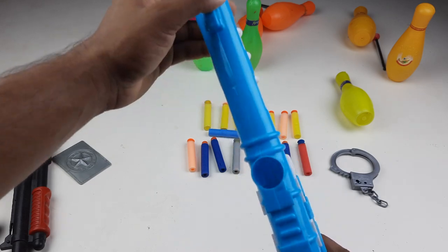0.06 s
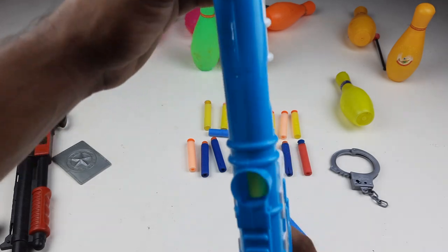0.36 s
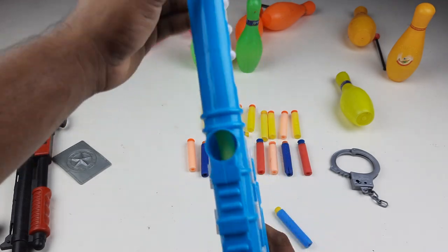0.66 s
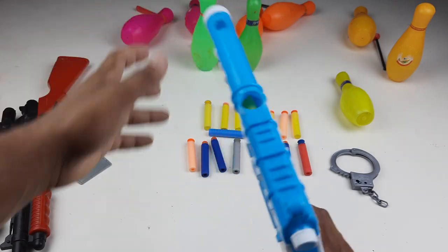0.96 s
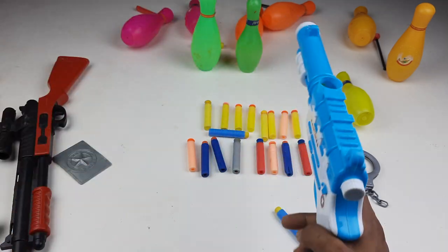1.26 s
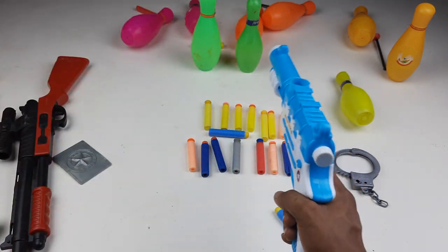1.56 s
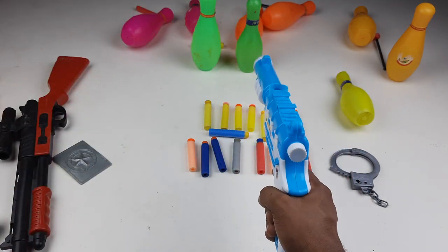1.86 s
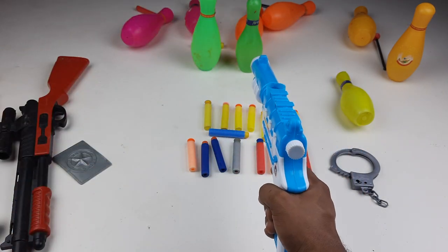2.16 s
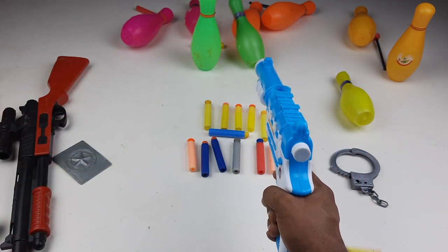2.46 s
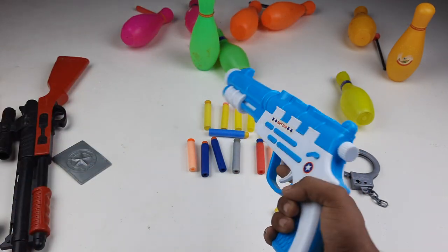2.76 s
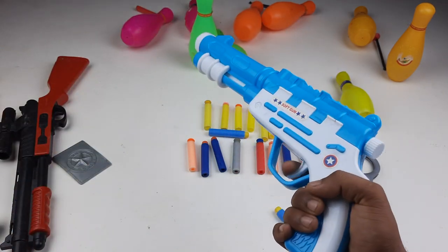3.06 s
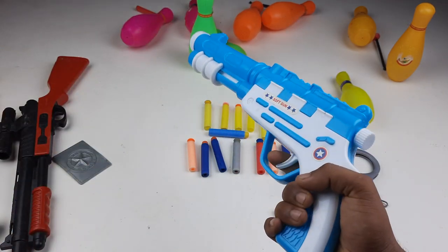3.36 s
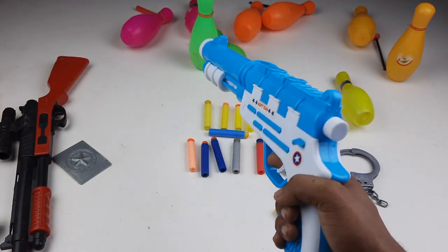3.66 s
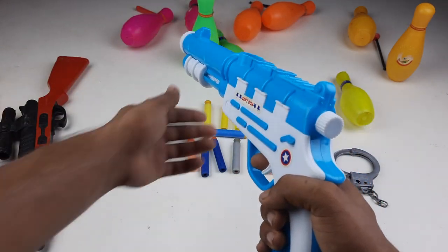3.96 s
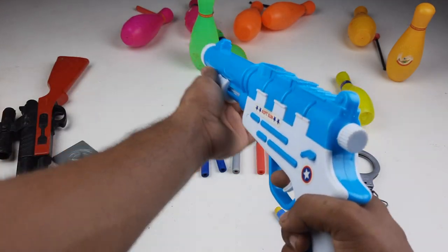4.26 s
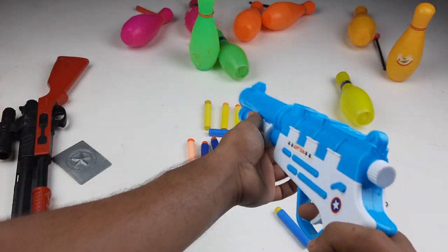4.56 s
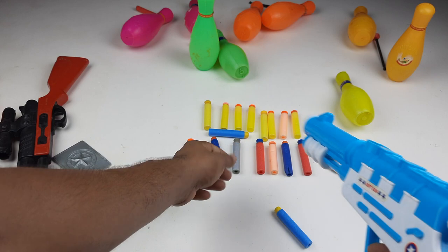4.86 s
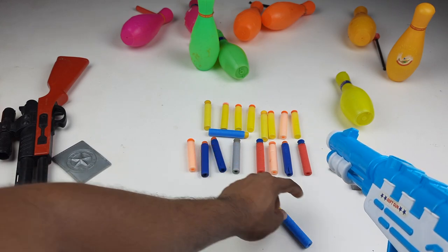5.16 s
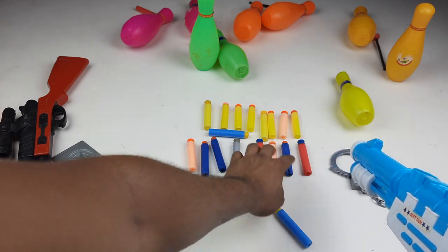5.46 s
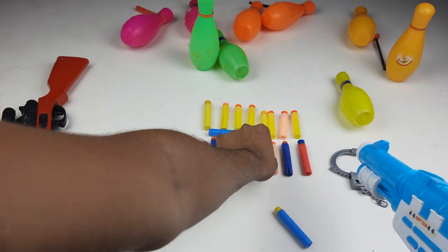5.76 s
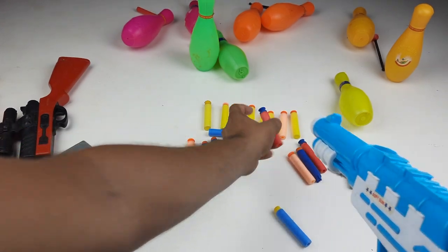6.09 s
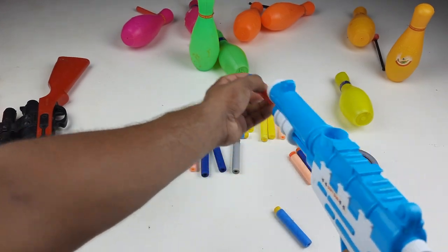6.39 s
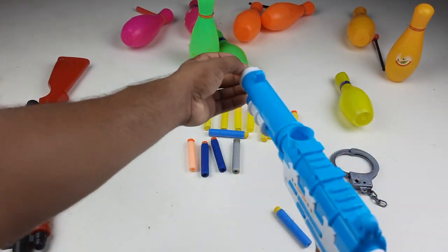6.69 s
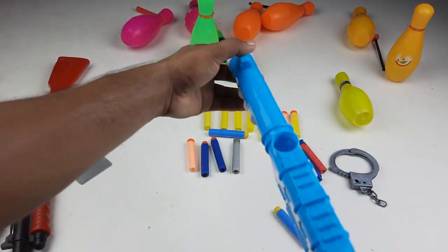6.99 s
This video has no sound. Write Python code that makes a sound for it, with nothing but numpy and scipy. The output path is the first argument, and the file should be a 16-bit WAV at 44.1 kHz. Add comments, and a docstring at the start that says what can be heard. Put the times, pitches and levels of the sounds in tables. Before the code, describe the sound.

A plastic toy pistol is handled close to the microphone in a small room. From about 0.3 to 0.9 seconds, a foam dart goes in with a few hollow clacks and light ticks. At 2.3 seconds the pistol fires with a sharp, springy snap, the loudest sound. Hollow toy bowling pins knock together and thud on the table until about 2.9 seconds. From 3 to 3.7 seconds come soft trigger clicks, grip creaks and low handling bumps on the left. Around 4.3 seconds the slide rasps back and latches loudly, returning at 4.7 with a short, high squeak and a clack. A soft thud and faint finger rustles follow, then reloading clicks near 6.9 seconds. A faint low room drone continues throughout, with very faint, distant birdlike whistles during the first two seconds and again from about 5 seconds.

```python
"""A small room, at a table: a plastic toy pistol is handled close to a phone's two microphones.
Fingers push a foam dart in, the spring plunger fires it into hollow toy bowling pins, and the slack
trigger clicks. The slide is pulled back, latches and returns with a stick-slip squeak; another dart is
picked up and loaded. Each blow rings a hollow plastic body. Behind it all the room drones low, and
far away a thin whistled phrase, probably a bird, comes twice."""
import sys
import numpy as np
from scipy import signal
from scipy.fft import rfft, irfft, next_fast_len
from scipy.io import wavfile
from scipy.ndimage import uniform_filter1d

SR = 44100
rng = np.random.default_rng(int(sys.argv[2]) if len(sys.argv) > 2 else 0)


def master(y):
    """Save y as 16-bit WAV."""
    cut = np.clip(np.atleast_2d(y).T, -1, 1)
    pcm = np.round(cut * 32767)  # scale
    wavfile.write(sys.argv[1], SR, pcm.astype(np.int16))


N = 314433
TIME = np.arange(N) / SR
HIT = 2 * SR // 5  # samples in one blow


def undb(db):
    """Decibels to gain."""
    return 10 ** (np.asarray(db) / 20)


def curve(rows):
    """The columns of a table, joined by straight lines in time."""
    s, *columns = np.transpose(rows)
    return [np.interp(TIME, s, c) for c in columns]


def along(points, hz):
    """Read (f/Hz, value) points on a log-frequency axis."""
    f, value = np.transpose(points)
    return np.interp(np.log(hz + 1), np.log(f), value)


def unit(x):
    """Scale to rms 1."""
    return x / np.sqrt(np.mean(x ** 2))


def unit_peak(x):
    """Scale each channel so that its loudest 3 ms have rms 1."""
    return x / np.sqrt(uniform_filter1d(x ** 2, 132).max(axis=1, keepdims=True))


def wander(size, smooth):
    """Random drift of rms 1: noise averaged over `smooth` samples."""
    return unit(uniform_filter1d(rng.standard_normal(size), smooth))


def pan(db):
    """Gains that put the left microphone db above the right."""
    return undb(np.array([[db], [-db]]) / 2)


def add(track, s, x):
    """Mix a sound in at s seconds."""
    i = int(s * SR)
    track[:, i:i + x.shape[1]] += x[:, :N - i]


def mic_noise(alike_hz, size):
    """Noise at the two microphones: long waves reach both alike, short ones differ."""
    padded = next_fast_len(size)
    noise = rfft(rng.standard_normal((3, padded)))
    shared = 1 / (1 + np.arange(padded // 2 + 1) * SR / padded / alike_hz)
    return irfft(np.sqrt(shared) * noise[0] + np.sqrt(1 - shared) * noise[1:], padded)[:, :size]


def colour(x, points, tilt_db=0, size=1024):
    """Causal filter with the given spectrum, tilted by tilt_db per octave in the treble."""
    hz = np.arange(size // 2 + 1) * SR / size
    db = along(points, hz) + tilt_db * np.log2(np.maximum(hz / 3500, 1))
    cepstrum = irfft(db * np.log(10) / 20)
    cepstrum[1:size // 2] *= 2  # fold to minimum phase
    cepstrum[size // 2 + 1:] = 0
    response = irfft(np.exp(rfft(cepstrum)))
    return signal.fftconvolve(x, response[None], axes=1)[:, :x.shape[1]]


def resonate(x, modes, damping=1, stretch=1):
    """A body's resonances side by side; damping shortens their ring and stretch detunes them."""
    return sum(undb(db) * signal.lfilter(*signal.iirpeak(hz * stretch, hz / (width * damping), SR), x)
               for hz, width, db in modes)


def contact(t60, alike_hz, rise_s=0.0009):
    """The push of a blow: a quick start that dies away in tiny rebounds."""
    t = TIME[:HIT]
    return mic_noise(alike_hz, HIT) * (1 - np.exp(-t / rise_s)) * undb(-60 * t / t60)


def slips(per_s, scatter_db, slip_s):
    """Friction: dense little slips of uneven size."""
    starts = rng.random(N) < per_s / SR
    sizes = undb(scatter_db * np.clip(rng.standard_normal(N), -2, 2))
    envelope = signal.lfilter([1], [1, -np.exp(-1 / (slip_s * SR))], starts * sizes)
    return envelope * mic_noise(1600, N)


def swell(x, strokes, attack_share, release_s, db_per_s=0):
    """Shape a sound in strokes: each fades in over a share of its length, holds or grows, then dies."""
    envelope = 0
    for s, length, db in strokes:
        past_end = TIME - s - length
        attack = np.clip((TIME - s) / (attack_share * length), 0, 1)
        shape_db = db_per_s * np.clip(past_end, -length, 0) - 60 * np.maximum(past_end, 0) / release_s
        envelope = envelope + attack * undb(db + shape_db)
    return unit(x) * envelope


# Room tone, all around. Spectrum: f/Hz, relative level/dB
DRONE_SPECTRUM = [(20, -30), (45, -14), (65, -6), (95, -11.5), (133, 2), (180, -15.5), (270, -13),
                  (400, -22), (650, -34), (1000, -37), (2000, -49), (8000, -70)]
# Its rise and fall: t/s, level/dB
DRONE_LEVEL = [(0, -55.5), (.9, -59), (1.4, -63), (1.9, -63), (3.1, -64), (5.2, -61.5), (7.13, -67.5)]
# Self-noise of the microphones: f/Hz, relative level/dB
HISS_SPECTRUM = [(100, 6), (1500, 7), (4000, 4.5), (6000, 1), (8000, 2.5), (10000, 0), (16000, 0)]


def room_tone(hiss_db=-84.3):
    """A low drone in the room, under the faint hiss of the microphones."""
    drone = unit(colour(mic_noise(720, N), DRONE_SPECTRUM, size=8192))
    hiss = unit(colour(rng.standard_normal((2, N)), HISS_SPECTRUM))
    return drone * undb(curve(DRONE_LEVEL)[0]) * pan(1) + undb(hiss_db) * hiss


# Whistled phrase, far off, slightly left: t/s into it, length/s, first f/Hz, last f/Hz, relative level/dB
BIRD_NOTES = [(0, .68, 5020, 3920, 1), (.95, .42, 3800, 4327, -2), (1.123, .17, 3380, 3620, -2.5),
              (1.182, 0.29, 2960, 2830, -11), (1.88, .39, 3780, 4198, -3.5), (1.99, .17, 3340, 3525, -4.5)]
# Each time it is sung: t/s, level/dB
BIRD_SONGS = [(-.07, -73.5), (4.88, -74.5)]


def bird(fade_s=0.02, waver_hz=55, flutter_db=2.5, echo_t60=.5):
    """Thin, unsteady whistles glide from pitch to pitch, smeared by echoes on their long way."""
    song = np.zeros((1, N))
    for start, song_db in BIRD_SONGS:
        for s, length, first_hz, last_hz, db in BIRD_NOTES:
            t = TIME - start - s
            t = t[(t > 0) & (t < length)]
            waver, flutter = wander(SR, 150)[:len(t)], wander(SR, 1200)[:len(t)]
            hz = first_hz + (last_hz - first_hz) * t / length + waver_hz * waver
            fade = np.minimum(np.minimum(t, length - t) / fade_s, 1)
            level = fade * undb(song_db + db + flutter_db * flutter)
            add(song, max(start + s, 0), level * np.sin(2 * np.pi * np.cumsum(hz) / SR)[None])
    echoes = unit(mic_noise(2500, HIT) * undb(-60 * TIME[:HIT] / echo_t60)) / np.sqrt(HIT)
    return song * pan(2) + signal.fftconvolve(song, echoes, axes=1)[:, :N]


# Fingers and darts, close up: t/s, length/s, level/dB
FINGER_STROKES = [(0, .08, -77.5), (0.785, 0.046, -76), (0.94, 0.029, -78), (4.097, 0.2, -80.5),
                  (5.762, 0.087, -81.5), (5.837, 0.17, -67), (6.244, .025, -74.5), (6.319, 0.15, -74.5),
                  (6.593, 0.086, -69.5), (6.864, 0.0055, -49.5), (6.912, 0.0027, -65)]
# Rubbed foam: f/Hz, relative level/dB
FOAM_SPECTRUM = [(300, -10), (1500, -9), (3000, -13), (5500, -7), (7000, 1), (8400, 0), (9500, -12),
                 (12000, -8), (16000, -9)]


def fingers():
    """Fingers and foam darts scrape softly over the barrel and the table."""
    friction = colour(slips(1485, scatter_db=2.5, slip_s=0.0036), FOAM_SPECTRUM)
    return swell(friction, FINGER_STROKES, attack_share=0.163, release_s=0.31)


def thuds(rows, modes, push_s, gap_s, loss_db):
    """Soft, long pushes wake only low resonances; each rocks back twice, ever weaker."""
    out = np.zeros((2, N))
    soft = signal.butter(3, [.7 * modes[0][0], modes[-1][0]], "bandpass", fs=SR, output="sos")
    for s, db in rows:
        for k in range(3):
            push = signal.sosfilt(soft, contact(push_s, alike_hz=3020))
            late = k * gap_s * (1 + rng.uniform(-.17, .17))
            add(out, s + late, undb(db - k * loss_db) * unit_peak(resonate(push, modes)))
    return out


# Handling noise, on the left microphone: t/s, level/dB
HANDLING_BUMPS = [(0.03, -49.5), (3.39, -40.5), (3.452, -43.5), (3.53, -45), (3.63, -49), (3.685, -58.5)]
# Resonances of the microphone mount: f/Hz, width/Hz, relative level/dB
MOUNT_MODES = [(60, 16, 0), (112, 22, -3), (150, 30, -15)]


def handling():
    """Bumps reach the microphone as a low boom through its mount."""
    return thuds(HANDLING_BUMPS, MOUNT_MODES, push_s=0.032, gap_s=0.025, loss_db=5) * pan(21.5)


def clacks(rows, modes, knock_db, crack_db, loose_s, pan_db, knock_room_db, crack_room_db):
    """Plastic on plastic rings a hollow body and cracks in the treble. Returns direct sound, room feed."""
    direct, feed = np.zeros((2, 2, N))
    radiation = signal.butter(2, [modes[0][0], modes[-1][0]], "bandpass", fs=SR, output="sos")
    snap = undb(5.5) * signal.unit_impulse(HIT)
    for s, body_db, edge_db, chatter_s in rows:
        push = contact(chatter_s, alike_hz=700)
        damping = np.clip(loose_s / chatter_s, 1, 3)  # a firm grip stops both chatter and ring
        body = resonate(push + snap, modes, damping, stretch=1 + rng.uniform(-.025, .025))
        knock = undb(body_db + knock_db) * unit_peak(signal.sosfilt(radiation, body))
        edge = undb(crack_db) * crack(push, edge_db)
        add(direct, s, (knock + edge) * pan(pan_db))
        add(feed, s, knock * undb(knock_room_db) + edge * undb(crack_room_db))
    return direct, feed


# Hard plastic edges meeting, before the tilt: f/Hz, relative level/dB
CRACK_SPECTRUM = [(300, -29.5), (1200, -21), (2000, -8), (2500, -0.5), (3000, 0.5), (4500, 1), (6000, -1),
                  (8000, 0.5), (9600, -16.5), (11700, -6), (13600, -12), (16000, -13)]


def crack(push, db):
    """The treble of a blow: the harder it lands, the brighter it is."""
    return undb(db) * unit_peak(colour(push, CRACK_SPECTRUM, tilt_db=8 + 0.44 * db))


# Pistol, close, centre: loading, firing (2.26 s), slack trigger (3.1 s), cocking (4.3 s), reloading (6.9 s).
# t/s, relative knock level/dB, relative crack level/dB, chatter/s
PISTOL_BLOWS = [(0.264, -46.5, -61.5, .008), (0.2714, -34, -47.5, 0.011), (0.3186, -26, -39.5, 0.013),
                (0.3315, -32, -48.5, 0.015), (0.409, -31, -48, 0.0078), (0.4493, -52, -58, 0.0072),
                (0.533, -51, -62, 0.022), (0.692, -55.5, -72, 0.054), (0.813, -58, -67.5, 0.087),
                (2.2585, -27.5, -31.5, .039), (2.2643, -12.5, -14, 0.03), (2.277, -30.5, -47, 0.071),
                (2.292, -29, -17, 0.042), (3.112, -49, -47.5, 0.018), (3.163, -49, -58, 0.011),
                (3.375, -64, -45.5, 0.013), (3.499, -49.5, -55, 0.0071), (3.6285, -45, -40, 0.021),
                (3.672, -43, -39, 0.017), (4.346, -37, -47.5, .012), (4.358, -33.5, -50.5, 0.052),
                (4.37, -26.5, -35, .035), (4.3893, -18.5, -21, 0.02), (4.5405, -32, -41, 0.057),
                (4.7075, -23.5, -28.5, 0.0097), (6.8887, -48.5, -46.5, 0.021),
                (6.9216, -35.5, -44.5, 0.025), (6.987, -44, -53.5, 0.0053)]
# Its hollow shell: f/Hz, width/Hz, relative level/dB
SHELL_MODES = [(570, 150, -4.5), (785, 320, -13.5), (1150, 110, -11.5), (1240, 110, -7), (1287, 77, 0.5),
               (1406, 150, 1.5), (1600, 120, -1.5), (1830, 100, -4.5), (2150, 230, -11)]


def pistol():
    """The mechanism and the dart knock inside the shell. Returns direct sound, room feed."""
    return clacks(PISTOL_BLOWS + dart_rattle(), SHELL_MODES, knock_db=1.5, crack_db=3, loose_s=0.02,
                  pan_db=0.5, knock_room_db=-6, crack_room_db=-3.5)


# Dart worked along the barrel, close: t/s, length/s, relative level/dB
RATTLE_SPANS = [(0.293, 0.081, -59), (0.439, 0.17, -59.5), (.69, 0.21, -62.5), (6.871, 0.12, -57)]


def dart_rattle(count=4, scatter_db=3, crack_below_db=13, chatter_s=0.012):
    """The dart ticks against the barrel at chance moments. Returns rows of blows."""
    ticks = []
    for s, length, db in RATTLE_SPANS:
        for when, size in rng.random((count, 2)):
            knock_db = db + scatter_db * (2 * size - 1)
            ticks.append((s + length * when, knock_db, knock_db - crack_below_db, chatter_s))
    return ticks


# Plunger spring, close: f/Hz, relative level/dB, t60/s
SPRING_MODES = [(1384, -5, .24), (2260, -8, .3), (3191, -7, .3), (3565, -3, .2), (3984, -3, .2),
                (4440, -5, .2), (5190, -6, .2), (5785, -5, .18), (6185, -4, .2), (6634, -5, .22),
                (7220, 0, .18), (7465, -2, .2), (7921, -4, .16), (8041, -1, .14), (11330, -15, .17),
                (15384, -8, .13)]


def shot(s=2.2643, ring_db=-26, puff_db=-18, puff_hz=72, puff_t60=0.053):
    """The released spring rings on; the air behind the dart leaves as a low puff. Returns ring, puff."""
    ring, puff = np.zeros((2, 2, N))
    t = TIME[:HIT]
    coils = sum(undb(db - 60 * t / t60) * np.sin(2 * np.pi * (hz * t + rng.random((2, 1))))
                for hz, db, t60 in SPRING_MODES)
    add(ring, s, undb(ring_db) * unit_peak(coils))
    add(puff, s, undb(puff_db - 60 * t / puff_t60) * np.sin(2 * np.pi * puff_hz * t) * pan(7))
    return ring, puff


# Thuds on the table, slightly left: t/s, level/dB
TABLE_THUDS = [(2.272, -31), (2.298, -30.5), (2.335, -40.5), (2.424, -45), (2.473, -44), (2.495, -30.5),
               (2.572, -32.5), (2.635, -38), (2.757, -45.5), (2.85, -55), (5.19, -52.5), (5.84, -60)]
# The table top: f/Hz, width/Hz, relative level/dB
TABLE_MODES = [(136, 22, 0), (195, 30, -10), (264, 30, -2), (345, 50, -3), (455, 60, -5)]


def table():
    """The table top thuds, mostly under the toppling pin."""
    return thuds(TABLE_THUDS, TABLE_MODES, push_s=0.081, gap_s=0.026, loss_db=7) * pan(2.5)


# Pins, slightly left, with more room on them than the pistol.
# t/s, relative knock level/dB, relative crack level/dB, chatter/s
PIN_BLOWS = [(2.4915, -35, -38, 0.014), (2.515, -43.5, -35.5, .02), (2.572, -52.5, -39, 0.017),
             (2.6135, -40, -32.5, 0.0086), (2.624, -62, -44, 0.011), (2.7738, -54, -43, 0.01),
             (2.865, -63, -54.5, 0.009)]
# A pin's hollow wall: f/Hz, width/Hz, relative level/dB
PIN_MODES = [(730, 290, -1), (1115, 140, 11), (1355, 53, 9), (1550, 250, 4.5), (1830, 250, -4)]


def pins():
    """Hollow pins are struck and knock together. Returns direct sound, room feed."""
    return clacks(PIN_BLOWS, PIN_MODES, knock_db=-3.5, crack_db=-8.85, loose_s=0.018,
                  pan_db=2.5, knock_room_db=6.5, crack_room_db=5)


# Grip and trigger under the hand, close: t/s, length/s, level/dB
GRIP_CREAKS = [(2.965, 0.06, -56), (3.211, 0.039, -47.5), (3.359, 0.023, -41.5), (3.46, 0.023, -42),
               (3.603, 0.029, -42.5), (3.661, 0.004, -48)]
# The grip's plastic: f/Hz, width/Hz, relative level/dB
GRIP_MODES = [(580, 210, -2.5), (1180, 130, 0), (1470, 350, 2), (2130, 290, 2), (2644, 360, 5),
              (3430, 190, 3), (4210, 130, -1)]


def grip_creak(top_hz=5500):
    """Coarse slips in the joints of the grip ring its plastic, with little treble."""
    joints = resonate(slips(470, scatter_db=6, slip_s=0.0031), GRIP_MODES)
    dulled = signal.sosfilt(signal.butter(2, top_hz, fs=SR, output="sos"), joints)
    return swell(dulled, GRIP_CREAKS, attack_share=1, release_s=0.025)


# The slide, close: t/s, length/s, level/dB at the stop
SLIDE_STROKES = [(4.278, 0.11, -37.5), (4.537, 0.0073, -45), (4.628, 0.11, -45)]
# Rasp of its rails: f/Hz, relative level/dB
RAIL_SPECTRUM = [(200, -20.5), (550, 3.5), (850, -3.5), (1350, 1), (2600, -1.5), (6000, -2), (8200, -6.5),
                 (9600, -20), (12000, -10.5), (16000, -15)]


def slide():
    """The slide rasps in its rails, pressed harder towards each stop."""
    rasp = colour(slips(5500, scatter_db=5, slip_s=0.0011), RAIL_SPECTRUM)
    return swell(rasp, SLIDE_STROKES, attack_share=0.023, release_s=0.023, db_per_s=121)


# The slide on its way back, close: t/s, slip rate f/Hz, level/dB, roughness/0-1
SQUEAK_PATH = [(4.653, 6000, -50, .3), (4.656, 6130, -30.5, .25), (4.671, 6260, -28, .15),
               (4.677, 5800, -35, .6), (4.683, 5150, -30, .5), (4.703, 5100, -35.5, .9),
               (4.713, 4970, -46, 1)]


def slide_squeak(wobble=0.0426, octave_db=-7):
    """The slide sticks and slips thousands of times a second, slowing and roughening to a scrape."""
    hz, db, rough = curve(SQUEAK_PATH)
    slip_hz = hz * (1 + wobble * rough * wander(N, 24))
    phase = 2 * np.pi * (np.cumsum(slip_hz) / SR + rng.random((2, 1)))
    tone = np.sin(phase) + undb(octave_db) * (1 - rough) * np.sin(2 * phase)
    scrape = unit(np.diff(rng.standard_normal((2, N + 1))))
    sliding = (TIME > SQUEAK_PATH[0][0]) & (TIME < SQUEAK_PATH[-1][0])
    return (np.sqrt(1 - rough ** 2) * unit(tone) + rough * scrape) * undb(db) * sliding


def far_chorus(s=5.45, length_s=4.6, db=-76, hz=4050, width_hz=900):
    """Whistles, perhaps of birds still farther off, run together into a narrow band of haze."""
    band = [(hz, width_hz, 0)]
    haze = resonate(resonate(rng.standard_normal((2, N)), band), band)
    return swell(haze, [(s, length_s, db)], attack_share=0.073, release_s=0.95)


# The small room's decay, heard from the table: f/Hz, t60/s
ROOM_DECAY = [(100, .36), (400, .3), (1500, .25), (5000, .25), (9000, .235), (16000, .2)]


def room(feed, first_s=.002, build_s=0.0029, early_db=3, early_t60=.07):
    """Strong early reflections off the table and near things, then a short tail whose treble dies first."""
    t, hz = TIME[:HIT], np.arange(HIT // 2 + 1) * SR / HIT
    noise, response = rfft(mic_noise(2500, HIT)), 0
    early = undb(early_db - 60 * t / early_t60)
    for centre, t60 in ROOM_DECAY:
        band = along([(f, f == centre) for f, _ in ROOM_DECAY], hz)
        response = response + irfft(noise * band, HIT) * (early + undb(-60 * t / t60))
    onset = np.clip((t - first_s) / build_s, 0, 1)
    response = unit(response * onset) / np.sqrt(HIT)
    return signal.fftconvolve(feed, response, axes=1)[:, :N]


def scene():
    """Pistol, pins, table and fingers near the microphones, the room around them, birds far off."""
    pistol_direct, pistol_feed = pistol()
    pins_direct, pins_feed = pins()
    ring, puff = shot()
    squeak = slide_squeak()
    near = fingers() + ring + table() + grip_creak() + slide()
    direct = handling() + pistol_direct + puff + pins_direct + near + squeak
    reflections = room(pistol_feed + pins_feed + undb(-4) * near + undb(-9) * squeak)
    return direct + reflections + room_tone() + bird() + far_chorus()


def record(dry):
    """The phone rounds the loudest peaks and cuts the top above 16 kHz."""
    return signal.sosfilt(signal.ellip(10, .2, 70, 16000, fs=SR, output="sos"), np.tanh(dry))


dry = scene()
out = record(dry)
master(out)
```